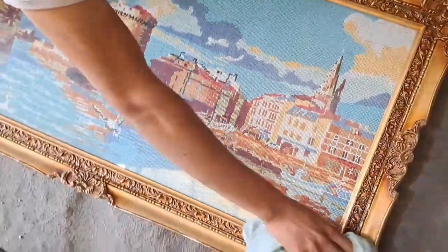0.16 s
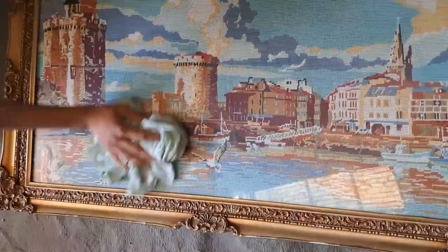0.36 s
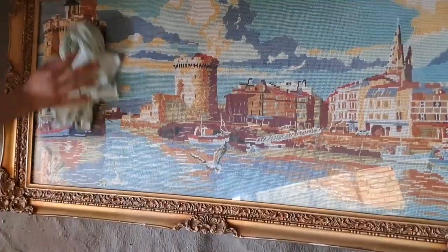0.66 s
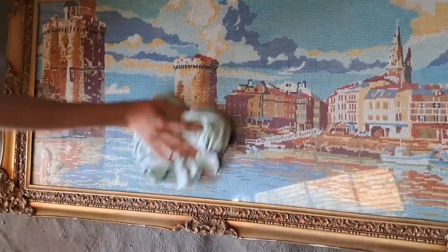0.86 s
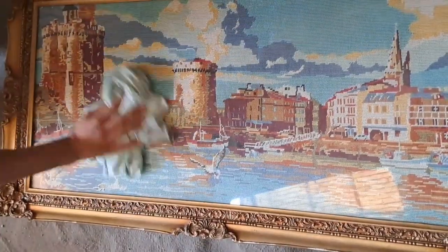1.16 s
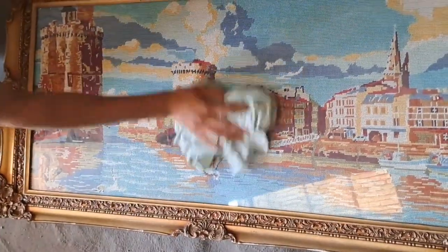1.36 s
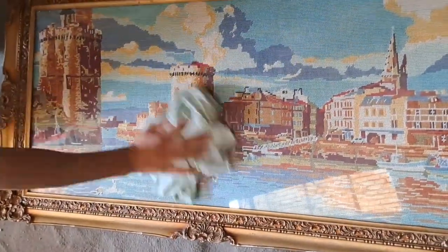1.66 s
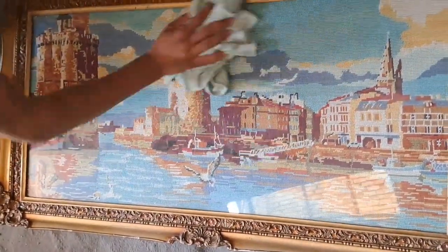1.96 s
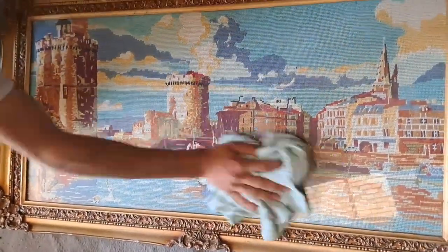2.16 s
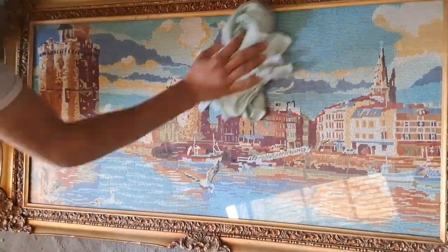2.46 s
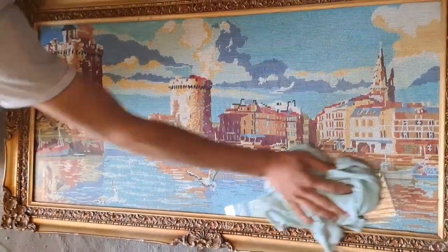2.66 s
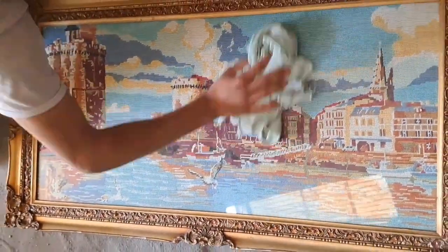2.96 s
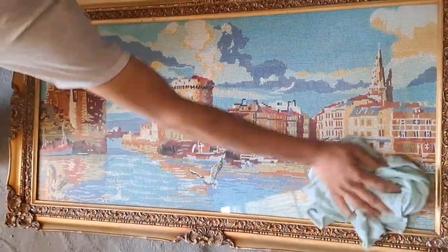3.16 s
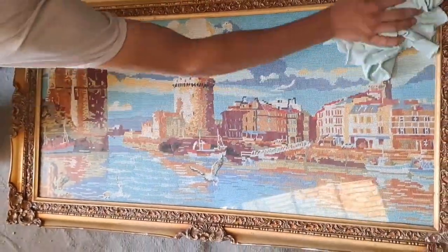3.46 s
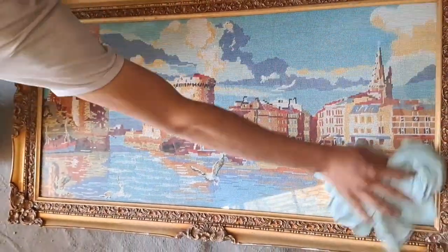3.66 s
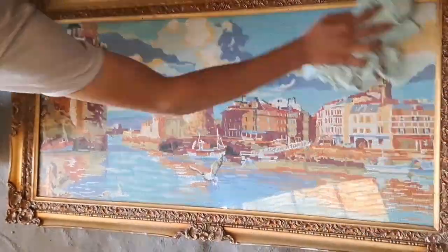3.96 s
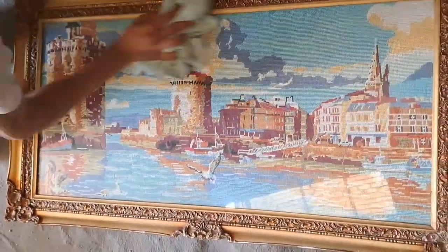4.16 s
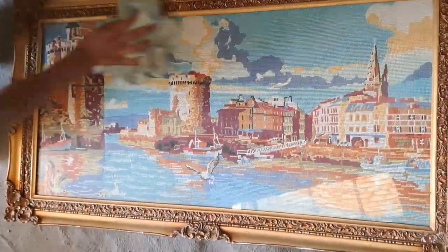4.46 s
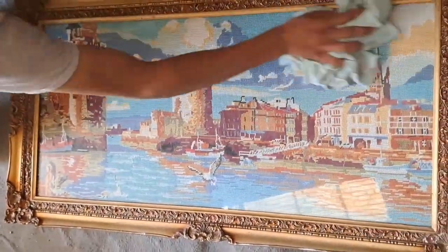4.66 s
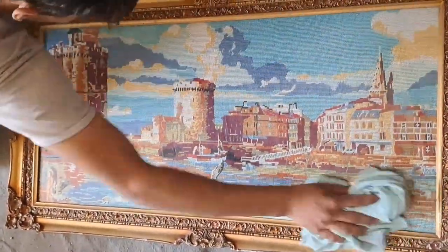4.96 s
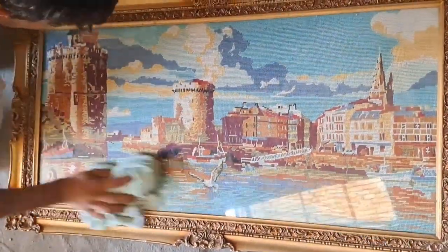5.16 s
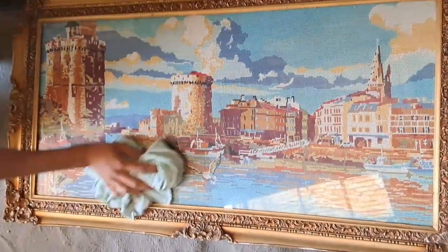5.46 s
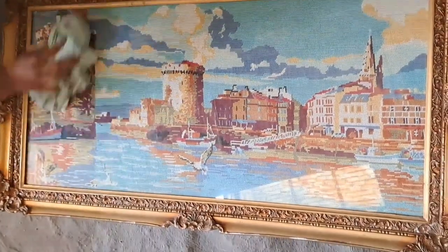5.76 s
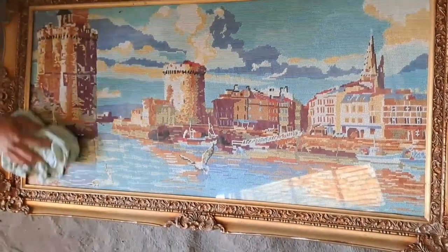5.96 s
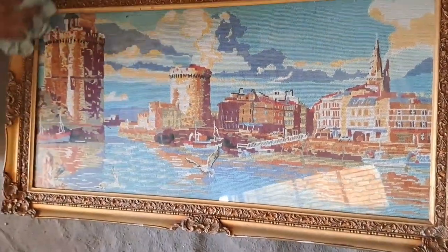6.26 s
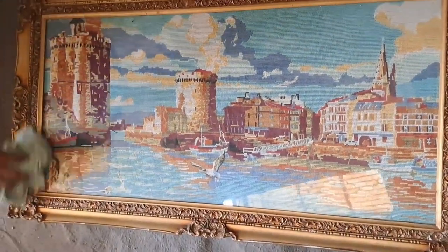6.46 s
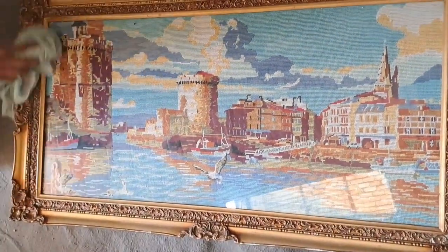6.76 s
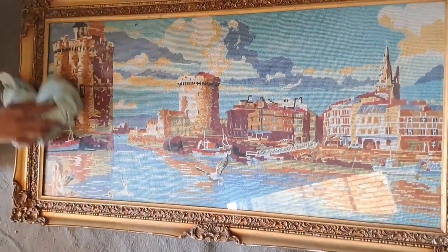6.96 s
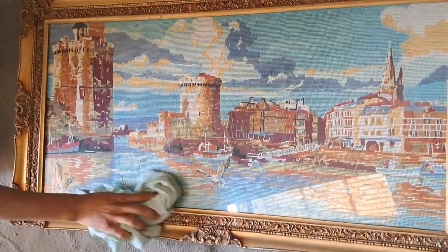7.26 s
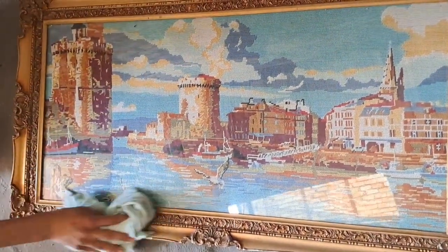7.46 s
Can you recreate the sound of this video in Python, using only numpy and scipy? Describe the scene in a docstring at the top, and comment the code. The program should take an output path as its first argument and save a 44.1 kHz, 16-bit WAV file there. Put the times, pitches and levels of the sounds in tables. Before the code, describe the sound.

Low traffic rumble and wavering engine drones come in from outside while fabric brushes quickly over a pane nearby. It opens with dull rubbing and little knocks, then settles into irregular airy swishes with short gaps where the hand turns. One fast swish climbs in pitch just past four seconds. Crisp snaps against the frame follow around six, with faint echoing sparrow chirps scattered throughout. The treble sits left, the room is small and quiet.

```python
"""Wiping a framed picture

A bunched cloth wipes the glass of a framed picture in a quiet room: shaped noise hisses with each stroke
and drops where the hand turns; short noise bursts snap on the carved frame. Through a window come engine
hums (gliding sines), street rumble, drone and tyre roar (noise), and far sparrows (warbling sines in echo).
"""
import sys
import numpy as np
from scipy import signal
from scipy.fft import rfft, irfft, next_fast_len
from scipy.io import wavfile
from scipy.ndimage import uniform_filter1d, map_coordinates

SR = 44100
rng = np.random.default_rng(int(sys.argv[2]) if len(sys.argv) > 2 else 0)


def generate_wav(signal):
    """Clip the signal to [-1, 1] and save it as 16-bit WAV at the path in sys.argv[1]."""
    frames = np.transpose(np.atleast_2d(signal))
    scaled = np.clip(frames, -1, 1) * 32767
    pcm = np.round(scaled).astype(np.int16)
    wavfile.write(sys.argv[1], SR, pcm)


N = 336040  # length in samples


def amp(db):
    """Decibels to a linear gain."""
    return 10 ** (np.asarray(db) / 20)


def unit(x):
    """Scale to an rms of 1."""
    return x / np.sqrt(np.mean(x ** 2) + 1e-20)


def along(points, hz):
    """Read (f/Hz, value) points on a log frequency axis."""
    f, value = np.transpose(points)
    return np.interp(np.log(hz + 1), np.log(f + 1), value)


def curves(rows):
    """One value per sample for each column after the time."""
    s, *columns = np.transpose(rows)
    return [np.interp(np.arange(N) / SR, s, column) for column in columns]


def wobble(rate):
    """A smooth random curve with rate knots a second."""
    knots = rng.standard_normal(int(N * rate / SR) + 4)
    return map_coordinates(knots, [np.arange(N) * rate / SR])


def bump(peak_s, before_s, after_s):
    """A straight ramp up to 1 at peak_s and down again."""
    return np.interp(np.arange(N) / SR, [peak_s - before_s, peak_s, peak_s + after_s], [0, 1, 0])


def filtered(x, response):
    """Multiply the spectrum of x by a response of frequency."""
    m = next_fast_len(x.shape[-1] + 8192)
    shaped = rfft(x, m) * response(np.fft.rfftfreq(m, 1 / SR))
    return irfft(shaped, m)[..., :x.shape[-1]]


def panned(x, left_db):
    """Raise the left and lower the right by half the level difference each."""
    return x * amp([[left_db / 2], [-left_db / 2]])


def tail(t60, seconds):
    """A new stereo echo tail of decaying noise, scaled to energy 1 on the left."""
    t = np.arange(int(seconds * SR)) / SR
    echo = rng.standard_normal((2, len(t))) * amp(-60 * t / t60)
    return echo / np.linalg.norm(echo[0])


# How alike left and right are in the noise layers: f/Hz, correlation
STEREO_LIKENESS = [(60, 0.89), (180, 1), (550, 0.25), (1650, -0.2), (4970, -0.026), (15000, 0.039)]


def rush(spectrum, patchy_db, grain_db, left_db):
    """Stereo noise, rms 1 before panning, with patches of random gain and a fine uneven grain."""
    z = signal.stft(rng.standard_normal((2, N)), nperseg=512)[2]
    field = uniform_filter1d(rng.standard_normal(z.shape[1:]), size=6, axis=0)
    field = uniform_filter1d(field, size=10, axis=1)
    patchy = signal.istft(z * amp(patchy_db * unit(field)), nperseg=512)[1][:, :N]
    pair = patchy * amp(grain_db * wobble(60))
    # the spectrum falls away steeply an octave beyond either end
    closed = [(spectrum[0][0] / 2, -120)] + list(spectrum) + [(spectrum[-1][0] * 2, -120)]

    def mid_side_response(hz):
        # this blend of mid and side gives the wanted correlation
        angle = np.arccos(np.clip(along(STEREO_LIKENESS, hz), -1, 1)) / 2
        return amp(along(closed, hz)) * [np.cos(angle), np.sin(angle)]

    mid, side = filtered(pair, mid_side_response)
    return panned(unit(np.array([mid + side, mid - side])), left_db)


# Exhaust hums of passing engines, one list each, before waver and dips:
# t/s, f/Hz, level/dB, level of the octave above/dB (where it is heard)
ENGINE_HUMS = [
    [(0.0, 144.1, -41.5), (0.26, 148.5, -45), (0.34, 147, -31)],
    [(0.34, 122.2, -34), (0.45, 124.7, -42), (1.05, 126, -45.5), (1.4, 131, -39.5), (1.76, 134.1, -38.5),
     (2.1, 130.4, -38), (2.42, 134, -38.5), (2.73, 122, -41), (3.0, 116.6, -53)],
    [(1.05, 135.2, -37, -75), (1.41, 139, -38, -72), (1.68, 140.5, -35, -64), (1.95, 146, -39.5, -59),
     (2.22, 148.5, -41.5, -58.5), (2.4, 147, -66, -79)],
    [(2.55, 137.8, -46, -56.5), (2.7, 140.2, -44.5, -54.5), (2.95, 139.3, -38.5, -61.5),
     (3.15, 141.5, -45.5, -75), (3.5, 141, -39, -75), (3.89, 146, -41.5, -81), (4.12, 147.8, -50, -75),
     (4.23, 148.5, -31.5, -75), (4.42, 149.3, -32, -75), (4.69, 150.2, -37.5, -75),
     (5.05, 158.3, -35.5, -75), (5.35, 149, -46, -75), (5.58, 151, -41, -72), (5.85, 159, -68, -75)],
    [(3.05, 98.1, -52, -58), (3.15, 98.9, -52, -48), (3.3, 101.6, -32.5, -47.5), (3.6, 102.5, -34, -45),
     (3.86, 104.6, -31, -49), (4.22, 101.7, -35.5, -49), (4.5, 103, -33.5, -60), (4.94, 108.9, -39, -72),
     (5.11, 106.9, -35.5, -69), (5.56, 112.2, -38.5, -72), (5.88, 121.5, -42, -69), (6.19, 121, -42, -70),
     (6.55, 128.5, -39.5, -79), (6.8, 125.4, -37, -78), (6.88, 124.1, -53.5, -76), (7.2, 124.2, -49, -72),
     (7.35, 124.1, -58, -72)],
    [(5.7, 108.8, -53, -72), (6.05, 111.4, -39, -66), (6.25, 107.6, -42, -64), (6.4, 112.4, -40, -51.5),
     (6.6, 116, -44.5, -78), (6.76, 112.8, -40, -52), (7.0, 115.8, -53, -61), (7.15, 111.1, -73, -70)],
    [(4.2, 109.8, -43), (4.38, 121.5, -38), (4.56, 142, -43), (4.8, 143, -44), (4.91, 146.8, -40.5),
     (5.0, 147.6, -42)],
    [(6.85, 422.7, -63), (6.92, 419.5, -59), (7.08, 413, -54.5), (7.15, 418.7, -69)],
    [(7.15, 375.4, -50.5), (7.27, 376, -67), (7.45, 369, -55.5), (7.55, 378, -61)],
]
# Brief level dips of each hum, in the same order (a negative depth is a lift): t/s, depth/dB
HUM_DIPS = [
    [(.09, 4.5)],
    [(.61, 6), (.79, 4), (1.14, 6), (1.5, 12), (1.94, 12), (2.29, 8), (2.55, 12)],
    [(1.14, 13), (1.32, 5), (1.58, 7), (1.83, 3.5), (2.08, 12), (2.31, 3.5)],
    [(2.74, 9), (3.2, 6), (3.37, 9), (3.7, 7), (4.05, 19), (4.53, 9), (4.78, 7), (4.98, 14), (5.49, 12)],
    [(3.48, 15), (3.79, 8), (3.98, 21), (4.33, 12), (4.43, 14), (4.61, 6), (4.79, 17), (5.03, 13),
     (5.29, 9), (5.72, 9), (6.64, 4)],
    [(5.79, 14), (6.13, -1)],
    [(4.29, 4), (4.48, 9), (4.73, 6)],
    [],
    [],
]
DIP_HALF_S = 0.077  # half the length of a dip


def engines():
    """Each exhaust hum is a gliding sine, some with an octave, wavering in pitch and strength indoors."""
    out = np.zeros((2, N))
    drift, flutter, shift = wobble(11), wobble(18), wobble(1.51)
    for rows, dips in zip(ENGINE_HUMS, HUM_DIPS):
        span = slice(round(rows[0][0] * SR), round(rows[-1][0] * SR))
        hz, *partials_db = (curve[span] for curve in curves(rows))
        dip_db = np.zeros(len(hz))
        for s, depth_db in dips:
            dip_db += depth_db * np.sin(np.pi / 2 * bump(s, DIP_HALF_S, DIP_HALF_S)[span])
        # every hum reads its own stretch of the wavering
        own = (np.arange(len(hz)) + rng.integers(N)) % N
        edge = signal.windows.tukey(len(hz), .04 * SR / len(hz))  # 20 ms fades
        phase = 2 * np.pi * (np.cumsum(hz * (1 + .009 * drift[own])) / SR + rng.random())
        # the room shifts the long waves between left and right
        stereo_phase = np.array([[.0006], [-.0006]]) * hz * shift[own]
        wavers_db = [2.1 * flutter[own], 3.6 * flutter[own[::-1]]]  # fundamental, octave
        for k, level_db in enumerate(partials_db):
            gain = np.sqrt(2) * edge * amp(level_db + wavers_db[k] - dip_db)
            out[:, span] += gain * np.sin((k + 1) * (phase + stereo_phase))
    return panned(out, left_db=0.6)


# Street traffic, two lists played in a row: t/s, rumble level/dB, drone level/dB, tyre roar level/dB
STREET_LEVELS = [
    [(0.0, -35.5, -38, -53), (0.034, -43, -47.5, -61.5), (0.343, -46, -41.5, -51.5)],
    [(0.34, -49, -41, -68), (0.36, -40.5, -50.5, -62.5), (0.59, -46, -53.5, -67), (2.51, -47.5, -50, -57.5),
     (2.59, -53, -53, -60), (3.1, -43, -52, -51.5), (3.18, -42, -48.5, -55), (3.77, -41.5, -46, -51.5),
     (4.29, -42.5, -47.5, -51), (4.92, -39.5, -48.5, -55.5), (5.15, -35, -44.5, -53.5),
     (5.19, -40, -46.5, -52), (6.1, -48.5, -52.5, -59.5), (6.49, -48, -49.5, -54.5),
     (6.65, -44.5, -48.5, -56.5), (7.38, -46.5, -53, -59.5), (7.62, -51, -50.5, -56)],
]
# Relative spectrum of the rumble: f/Hz, level/dB per Hz
RUMBLE_SPECTRUM = [(15, -32), (25, -29), (50, -13), (90, -4), (130, -4), (170, -12.5), (230, -46.5)]
# Relative spectrum of the drone: f/Hz, level/dB per Hz
DRONE_SPECTRUM = [(120, -7), (180, -2.5), (250, -0.5), (370, -4.5), (450, -9.5), (600, -17.5), (800, -28)]
# Relative spectrum of the tyre roar: f/Hz, level/dB per Hz
TYRE_SPECTRUM = [(300, -22), (450, -2.5), (650, -1), (1000, 1), (1400, -3.5), (1900, -12), (2600, -24.5),
                 (3600, -43)]
# Relative spectrum of the building's steady low floor: f/Hz, level/dB per Hz
FLOOR_SPECTRUM = [(15, -9), (28, -4), (45, 3), (70, -9)]
FLOOR_DB = -59.5
DRONE_LEAD_S = 0.00015  # the drone reaches the right channel this much sooner


def street():
    """Traffic rumble, drone and tyre roar as shaped noise over the building's steady low floor."""
    rumble_db, drone_db, roar_db = curves(sum(STREET_LEVELS, []))
    rumble = amp(rumble_db) * rush(RUMBLE_SPECTRUM, patchy_db=-1.5, grain_db=1.5, left_db=-1.5)
    drone = amp(drone_db) * rush(DRONE_SPECTRUM, patchy_db=1.22, grain_db=0.9, left_db=1.6)
    roar = amp(roar_db) * rush(TYRE_SPECTRUM, patchy_db=1.42, grain_db=1.4, left_db=0.5)
    low_floor = amp(FLOOR_DB) * rush(FLOOR_SPECTRUM, patchy_db=1.2, grain_db=1.0, left_db=0.0)
    # half the lead delays the left, half advances the right
    sides = np.array([[-1], [1]])
    drone = filtered(drone, lambda hz: np.exp(1j * np.pi * hz * DRONE_LEAD_S * sides))
    return low_floor + rumble + roar + drone


# The cloth between strokes: t/s, glass hiss level/dB, fold rustle level/dB, scuff level/dB, dull drag level/dB
CLOTH_LEVELS = [(0.0, -63, -66, -61, -54.5), (0.045, -82, -80, -78, -62), (0.165, -78, -82, -76, -64.5),
                (0.229, -60, -64.5, -62.5, -53.5), (0.334, -56.5, -63, -63, -60),
                (0.379, -62.5, -69, -79, -90), (0.7, -63, -71, -80.5, -80.5), (1.6, -60.5, -70, -78.5, -86),
                (2.6, -62, -71.5, -81, -85), (2.77, -60.5, -69.5, -70.5, -65.5),
                (3.6, -64.5, -72, -77, -70.5), (4.4, -59.5, -68.5, -69.5, -70.5),
                (4.8, -66.5, -74.5, -79, -69.5), (5.3, -58.5, -65.5, -71, -63.5),
                (5.53, -61, -68.5, -68, -67), (6.05, -64.5, -69.5, -73.5, -76),
                (6.6, -62, -67, -61.5, -58.5), (7.1, -65.5, -72.5, -67, -61.5),
                (7.45, -61.5, -71.5, -73, -68.5), (7.62, -59, -62.5, -67, -61)]
# Strokes and flicks of the cloth: peak t/s, length/s, hiss rise/dB, scuff rise/dB, drag rise/dB
CLOTH_STROKES = [(0.502, 0.26, 4.5, 4, 3), (0.842, 0.099, 9, 4, 13.5), (1.0, 0.43, 3, 12, 4),
                 (1.261, .16, 7.5, 16, 10), (1.337, .1, 5, 9, 4), (1.442, 0.13, 3.5, -1, 1),
                 (1.794, .1, 4, 8, 5), (1.901, 0.12, 5, 7, 3), (1.946, 0.093, 1.5, 4, 23),
                 (1.994, .11, 11, 4, 15), (2.155, .2, 1.5, 4, 1), (2.404, 0.33, 4, 4, 19),
                 (2.88, 0.26, 2, 4, -1), (3.082, 0.082, 5.5, -6, 1), (3.35, 0.33, 8.5, 10.5, 7.5),
                 (3.748, 0.26, 2, 2, 7.5), (3.91, 0.1, 8, 13, 12), (4.17, 0.57, 8.5, 7.5, 13.5),
                 (4.2, .07, 6.5, -4, 1), (4.558, 0.36, 8.5, 2, 7.5), (4.659, 0.12, 4.5, 9, 0),
                 (4.929, 0.16, 2.5, -2, -4), (5.158, 0.32, 7.5, 12.5, 9.5), (5.425, 0.13, 1, 1, 4),
                 (5.685, 0.15, 6.5, 1, 7), (5.899, 0.2, 6.5, 6, 6.5), (6.05, .16, 5, 1, 0),
                 (6.364, 0.27, 4, 1.5, 3.5), (6.792, .24, 1.5, 0.5, 1.5), (7.075, .16, 4.5, 2.5, -2),
                 (7.538, 0.17, 3, 7.5, -3)]
BUILD_SHARE = 0.43  # part of a stroke spent speeding up
# The hand stops to turn: start t/s, length/s, treble drop/dB, scuff drop/dB
HAND_TURNS = [(3.443, 0.12, 18, 15), (3.75, 0.077, 11, 4), (4.357, 0.061, 14, 10), (5.316, 0.057, 10, 2),
              (6.55, .11, 12, 5), (6.83, 0.099, 10, 0), (7.376, 0.072, 10, -3)]
# Relative spectrum of fibres hissing on the glass: f/Hz, level/dB per Hz
HISS_SPECTRUM = [(7000, -24.5), (9500, -11.5), (11000, -3.5), (13000, 0.5), (16000, -4)]
# Relative spectrum of the rustling folds: f/Hz, level/dB per Hz
RUSTLE_SPECTRUM = [(4500, -12), (5800, -5), (7500, -1.5), (9000, -10), (11000, -19)]
# Relative spectrum of the scuffing pad: f/Hz, level/dB per Hz
SCUFF_SPECTRUM = [(2700, -19), (3500, -9), (4500, -6.5), (5500, -11), (6800, -19)]
# Relative spectrum of the dull drag: f/Hz, level/dB per Hz
DRAG_SPECTRUM = [(900, -27), (1400, -6.5), (2100, -2), (3000, -8.5), (4000, -17.5)]


def wiping():
    """Fibres hiss on the pane, folds rustle, the pad scuffs and drags; the treble favours the left."""
    hiss_db, rustle_db, scuff_db, drag_db = curves(CLOTH_LEVELS)
    treble_up_db, scuff_up_db, drag_up_db = np.zeros((3, N))
    for s, length, treble_rise_db, scuff_rise_db, drag_rise_db in CLOTH_STROKES:
        stroke = bump(s, BUILD_SHARE * length, (1 - BUILD_SHARE) * length)
        treble_up_db += treble_rise_db * stroke
        scuff_up_db += scuff_rise_db * stroke
        drag_up_db += drag_rise_db * stroke
    treble_drop_db, scuff_drop_db = np.zeros((2, N))
    for s, length, treble_db, mid_db in HAND_TURNS:
        slowing = signal.windows.tukey(round(length * SR), .7)
        start = round(s * SR)
        treble_drop_db[start:][:len(slowing)] = treble_db * slowing
        scuff_drop_db[start:][:len(slowing)] = mid_db * slowing
    # the folds follow the hiss less than dB for dB
    hiss_db = hiss_db + treble_up_db - treble_drop_db
    rustle_db = rustle_db + 0.79 * treble_up_db - 0.84 * treble_drop_db
    scuff_db = scuff_db + scuff_up_db - scuff_drop_db
    drag_db = drag_db + drag_up_db
    hiss = amp(hiss_db) * rush(HISS_SPECTRUM, patchy_db=0.8, grain_db=1.42, left_db=9.5)
    rustle = amp(rustle_db) * rush(RUSTLE_SPECTRUM, patchy_db=1.5, grain_db=1.9, left_db=3.0)
    scuff = amp(scuff_db) * rush(SCUFF_SPECTRUM, patchy_db=1.2, grain_db=1.4, left_db=2.0)
    drag = amp(drag_db) * rush(DRAG_SPECTRUM, patchy_db=1.04, grain_db=1.55, left_db=-0.2)
    return hiss + rustle + scuff + drag


# Cloth and nails catching on the carved frame:
# t/s, level/dB, burst length/s, 60 dB dying time/s, centre f/Hz, band sharpness (exponent), left over right/dB
FRAME_SNAPS = [(.104, -53, .008, .08, 1000, 2.2, 0), (.128, -60, .006, .06, 2500, 1.2, 0),
               (.19, -61, .004, .06, 4000, 1.2, 0), (.213, -56, .003, .05, 5000, 1.2, 0),
               (.293, -54, .006, .08, 6000, 1.2, 0), (.333, -48, .002, .03, 1500, 1.5, 0),
               (.842, -56, .006, .06, 12000, 2.5, 6), (1.949, -58, .006, .06, 2000, 1.5, 0),
               (2.345, -61, .015, .1, 2000, 2.2, 0), (2.428, -57, .004, .06, 2000, 1.5, 0),
               (2.455, -56, .012, .08, 1300, 1.8, 0), (2.76, -58, .004, .05, 2500, 1.5, 0),
               (2.975, -57, .02, .06, 1600, 2.5, 0), (3.085, -60, .006, .05, 2000, 2.5, 0),
               (3.279, -54, .005, .06, 6000, 1.2, 4), (3.39, -53, .003, .04, 11000, 2.5, 6),
               (3.931, -54, .005, .06, 5000, 1.2, 3), (4.567, -50, .005, .1, 1900, 2.8, 2),
               (4.646, -57, .004, .04, 9000, 1.2, 6), (5.16, -52, .004, .05, 3000, 1.5, 3),
               (6.1364, -32, .0035, .14, 6000, 1.1, -2), (6.1829, -34, .0066, .12, 7500, .75, 4),
               (6.1996, -35, .0075, .08, 7500, .7, 4), (7.493, -48, .002, .03, 12000, 4, 6),
               (7.4988, -35, .0006, .012, 12500, 4, 6), (7.5034, -36, .0005, .02, 12000, 2.5, 6)]


def snaps():
    """Each catch is a spiky noise burst, broad around its centre, that dies away into the room."""
    out, t = np.zeros((2, N + SR)), np.arange(SR // 4) / SR

    def notch(f):
        # a band near 9 kHz stays dull
        return 1 - 0.4 * np.exp(-((f - 9000) / 900) ** 2)

    for s, level_db, length, t60, hz, sharp, left_db in FRAME_SNAPS:
        spikes = rng.standard_normal((2, len(t))) * amp(1.2 * rng.standard_normal(len(t)))
        burst = unit(filtered(spikes, lambda f: (f / hz / (1 + (f / hz) ** 2)) ** sharp * notch(f)))
        # full strength, then 9 dB down at once and a straight decay in dB
        burst = burst * np.where(t < length, 1, amp(-9 - 60 * (t - length) / t60))
        wet = signal.fftconvolve(burst, tail(0.094, 0.083), axes=1)[:, :len(t)]
        snap = amp(level_db) * panned(burst + amp(-7.5) * wet, left_db)
        out[:, round(s * SR):][:, :len(t)] += snap
    return out[:, :N]


# Far sparrow chirps before their echo: t/s, length/s, start f/Hz, end f/Hz, warble scale/Hz, call peak level/dB
SPARROW_CHIRPS = [(0.504, 0.12, 5700, 4000, 500, -63), (0.896, 0.12, 4800, 4410, 995, -59.5),
                  (1.483, 0.16, 4830, 4350, 800, -63.5), (2.82, 0.07, 7000, 6900, 200.5, -66),
                  (2.847, 0.12, 5260, 4560, 590, -59), (3.955, 0.084, 5300, 4985, 400, -59.5),
                  (5.951, 0.12, 4375, 4100, 150.7, -67.5), (6.489, 0.066, 4795, 4767, 100.7, -62),
                  (7.274, 0.12, 5250, 4765, 450, -55), (7.31, .055, 3510, 3400, 120, -63)]
WARBLE_RATE = 700  # random pitch targets a second


def sparrows():
    """Hoarse, unevenly warbling sine chirps, heard only as their echoes off the street walls."""
    out = np.zeros((2, N + SR))
    for s, length, start_hz, end_hz, warble_hz, level_db in SPARROW_CHIRPS:
        u = np.linspace(0, 1, int(length * SR))
        targets = rng.uniform(-1.4, 1.4, 200)
        warble = np.interp(u * length, np.arange(200) / WARBLE_RATE, targets)
        hz = start_hz + (end_hz - start_hz) * u + warble_hz * warble
        call = np.sin(np.pi * u) ** .5 * np.sin(2 * np.pi * np.cumsum(hz) / SR)
        far = signal.fftconvolve(call[None], tail(0.15, .4), axes=1)
        out[:, round(s * SR):][:, :far.shape[1]] += amp(level_db) * panned(far, left_db=0.0)
    return out[:, :N]


# One fast stroke whose hiss rises in pitch: t/s, centre f/Hz, level/dB
FAST_STROKE = [(4, 7000, -81), (4.06, 9200, -60), (4.14, 10100, -56.5), (4.2, 12100, -51),
               (4.27, 13700, -48), (4.34, 13700, -90)]


def swish():
    """Noise through a band that climbs as the stroke speeds up."""
    hz, t, z = signal.stft(rng.standard_normal((2, N)), SR, nperseg=512)
    s, centre_hz, _ = np.transpose(FAST_STROKE)
    ratio = (hz[:, None] + 1) / np.interp(t, s, centre_hz)
    band = np.exp(-(np.log(ratio) / 0.25) ** 2)
    noise = unit(signal.istft(z * band, SR, nperseg=512)[1][:, :N])
    _, level_db = curves(FAST_STROKE)
    return amp(level_db) * panned(noise, left_db=4.5)


def scene():
    """Street and engines behind the wiping, snaps and sparrows."""
    return engines() + street() + wiping() + snaps() + sparrows() + swish()


TOP_HZ = 15830  # band limit


def record(dry):
    """Keep nothing at or above the band limit."""
    return filtered(dry, lambda hz: hz < TOP_HZ)


dry = scene()
out = record(dry)
generate_wav(out)
```